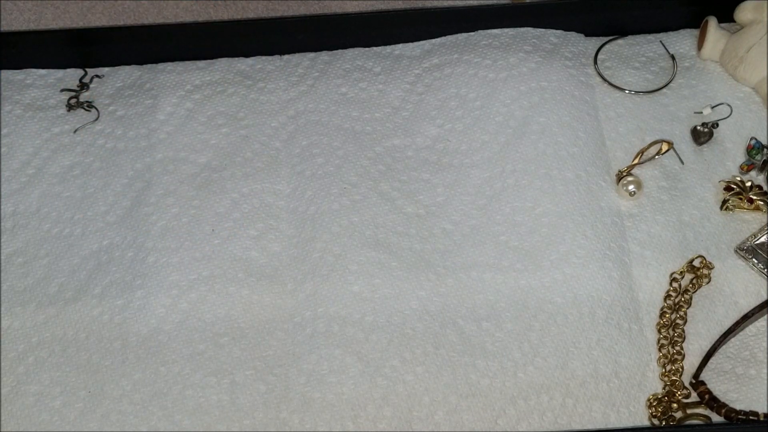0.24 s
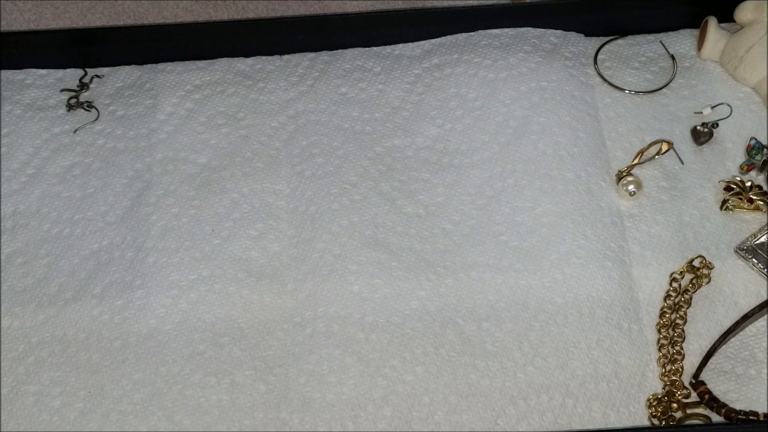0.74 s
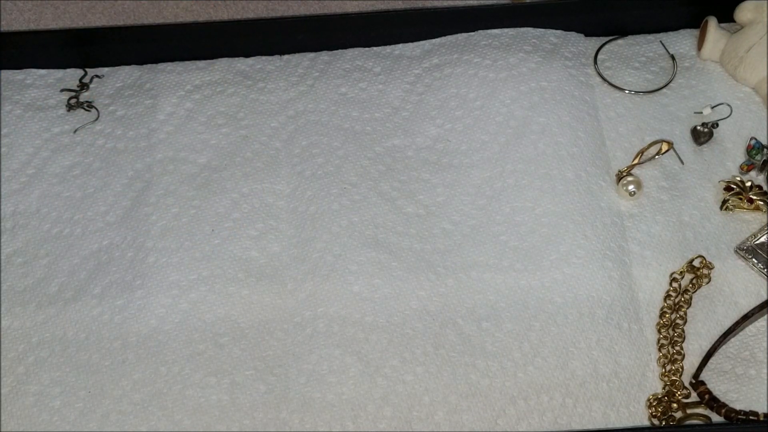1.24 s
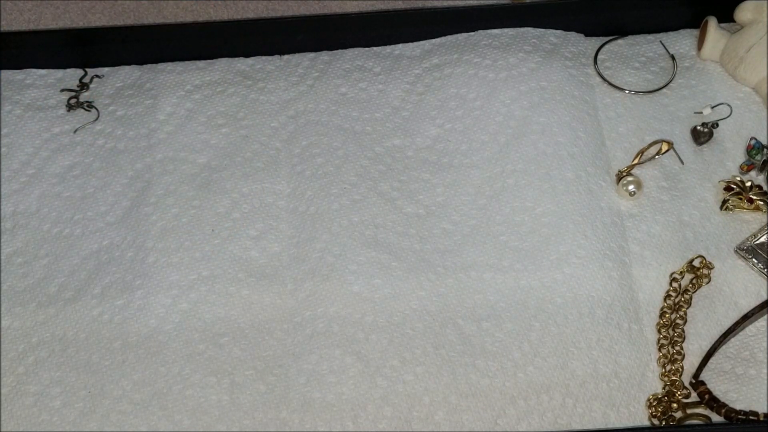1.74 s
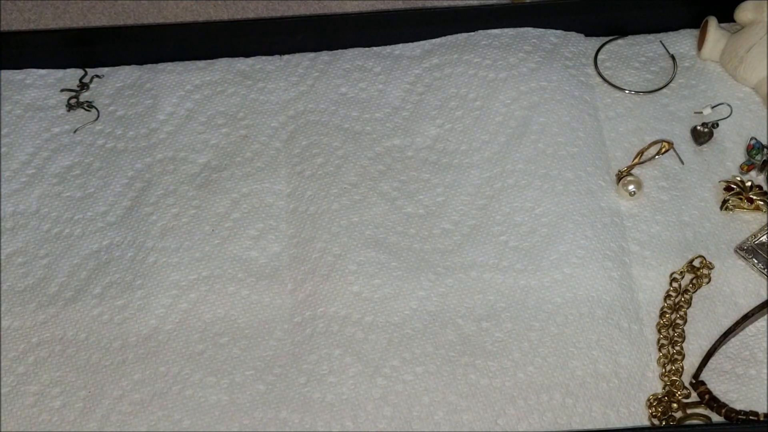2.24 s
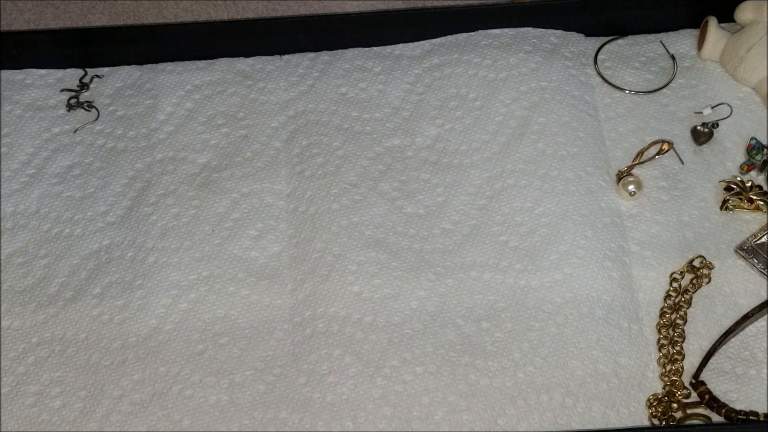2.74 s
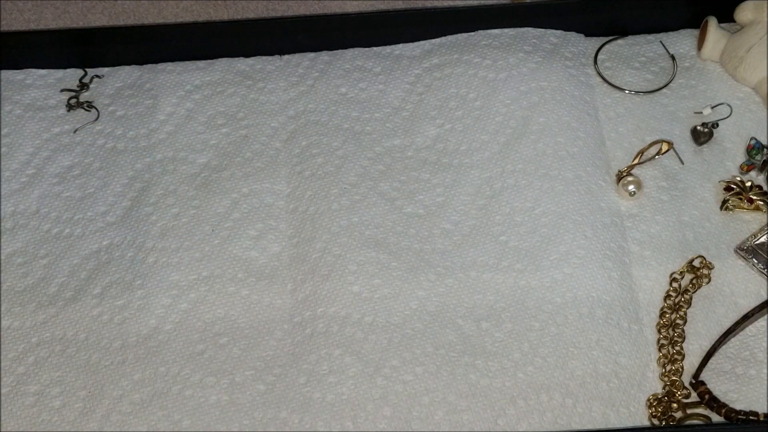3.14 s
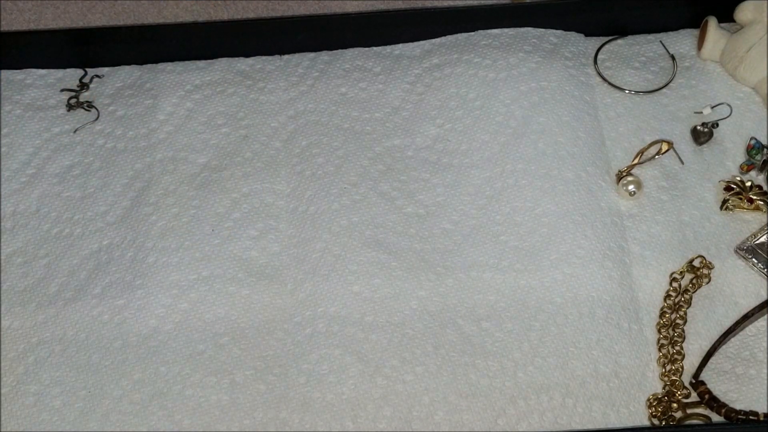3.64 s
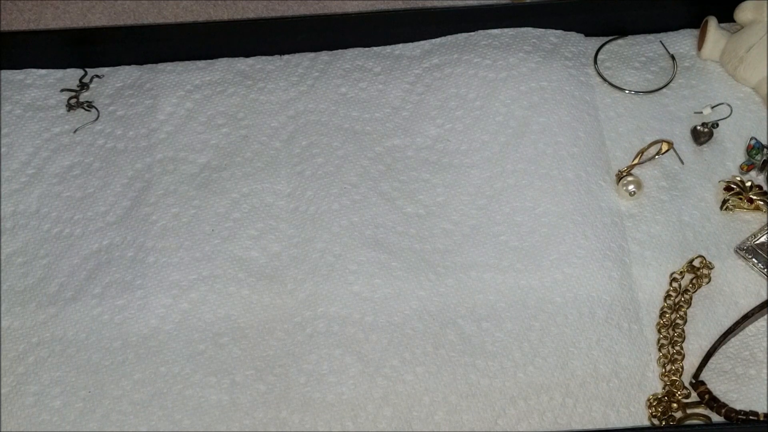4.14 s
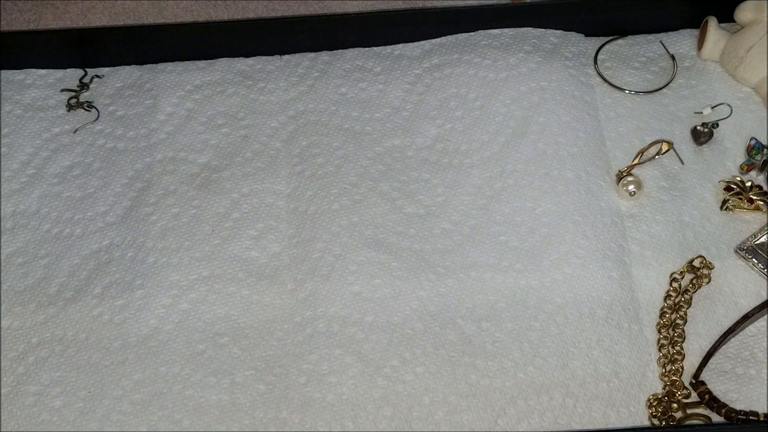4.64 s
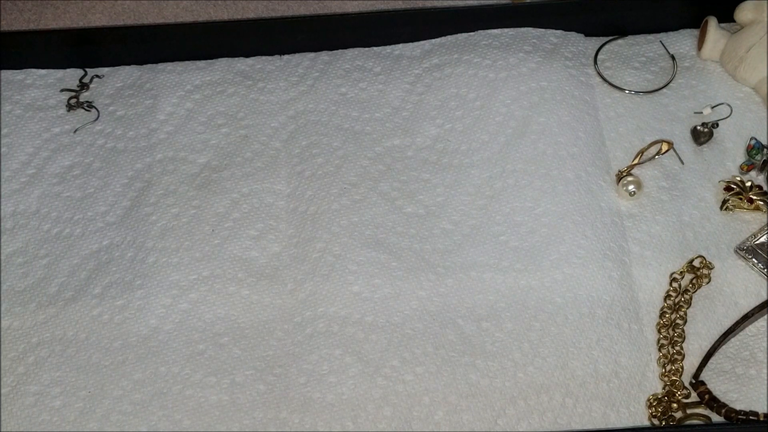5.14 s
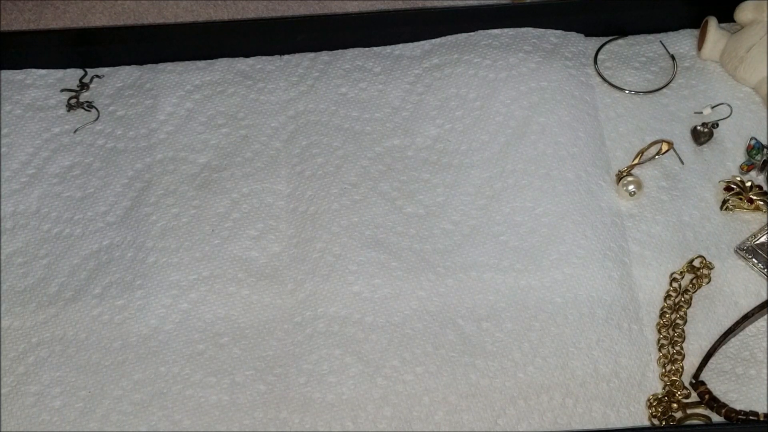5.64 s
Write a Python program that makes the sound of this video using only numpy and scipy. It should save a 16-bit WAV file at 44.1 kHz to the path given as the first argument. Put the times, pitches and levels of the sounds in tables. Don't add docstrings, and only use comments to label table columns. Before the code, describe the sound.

Very close stereo pickup in a quiet, softly damped room with low rumble and faint hiss. Sparse tiny bead ticks come first, then a jar tugs across padding, gets knocked hard, bounces and rattles briefly to rest. After a near-silent gap a hand thumps the table, then chains and beads rustle and clink against the jar until the end, slightly to the right.

```python
import sys
import numpy as np
from scipy import signal
from scipy.fft import rfft, irfft
from scipy.io import wavfile
from scipy.ndimage import uniform_filter1d

SR = 44100
rng = np.random.default_rng(int(sys.argv[2]) if len(sys.argv) > 2 else 0)


def gain_from_db(level_db):
    decades = np.asarray(level_db, float) / 20
    return 10 ** decades


def store_wav(level_fs):
    pcm = np.round(np.clip(np.atleast_2d(level_fs), -1, 1) * 32767)
    wavfile.write(sys.argv[1], SR, pcm.T.astype(np.int16))


N = 259749
RING_SIZE = 4096

# mode_hz, width_hz, level_db
JAR_ON_TABLE = [(506, 25, -1), (581, 17, 0.5), (690, 34, 0), (837, 56, -6), (947, 64, 8.5), (1130, 48, 3.5),
                (1415, 45, -0.5), (1535, 41, -10.5), (1736, 78, 7.5), (2063, 26, 0), (2220, 22, -8.5),
                (2700, 130, 1.5), (4330, 200, -5), (5690, 120, -2)]
# freq_hz, level_db_per_hz
KNOCK_COLOUR = [(200, -38.5), (300, -23), (360, -5), (480, -4.5), (1000, -11), (1700, -2.5), (2500, -12.5),
                (4300, -14), (6200, -22), (7500, -33), (10000, -16), (16000, -21)]
# freq_hz, level_db_per_hz
CLINK_COLOUR = [(200, -19.5), (450, -1.5), (900, -12.5), (1650, -11.5), (2180, -0.5), (2800, -10.5),
                (3800, -0.5), (6500, -4), (8000, -10), (11000, -3.5), (15500, -5.5), (17000, -7.5)]
# mode_hz, width_hz, level_db
PADDING = [(770, 120, 4.5), (1050, 300, 12), (1490, 380, -2.5), (2970, 62, 3), (3150, 280, -16),
           (5200, 240, -11)]
# freq_hz, level_db_per_hz
PAD_COLOUR = [(300, -21), (450, -2), (1200, -5.5), (2050, -14.5), (2800, -8.5), (3700, -8.5), (7500, -24.5),
              (16000, -19.5)]
JAR = dict(modes=JAR_ON_TABLE, colour=KNOCK_COLOUR, ring_db=-2.5, snap_db=1.5, spread_db=6.5, wander=0.0026)
PAD = dict(modes=PADDING, colour=PAD_COLOUR, ring_db=11.0, snap_db=4.0, spread_db=0.0, wander=0.015)


def evened(x):
    return x / np.sqrt(np.mean(x ** 2) + 1e-20)


def read(points, hz):
    f, value = np.transpose(points)
    return np.interp(np.log(hz + 1), np.log(f + 1), value)


def noise(colour, same, size, patchy_db):
    hop, hz = size // 4, np.fft.rfftfreq(size, 1 / SR)
    a, b, c, d, patches = rng.standard_normal((N // hop + 5, len(hz), 5)).T
    patches = uniform_filter1d(patches, size=4, axis=0)
    patches = evened(uniform_filter1d(patches, size=6, axis=1))
    same = np.clip(read(same, hz), -1, 1)[:, None]
    left, other = a + 1j * b, c + 1j * d
    z = np.array([left, same * left + np.sqrt(1 - same ** 2) * other])
    z *= gain_from_db(read(colour, hz)[:, None] + patchy_db * patches)
    return evened(signal.istft(z, nperseg=size, noverlap=size - hop)[1][:, :N])


def bands(low_hz):
    upper_hz = (1200, 3000, 8000, 16800)
    hz, edges = np.fft.rfftfreq(RING_SIZE, 1 / SR), (low_hz, *upper_hz)
    responses = []
    for k in range(4):
        sos = signal.butter(4, edges[k:k + 2], "bandpass", fs=SR, output="sos")
        responses.append(signal.sosfreqz(sos, hz, fs=SR)[1])
    return np.array(responses)[:, None]


def causal(db):
    log_gain = np.log(gain_from_db(np.maximum(db, -100)))
    mirrored = np.r_[log_gain, log_gain[-2:0:-1]]
    return np.exp(np.conj(signal.hilbert(mirrored))[:len(db)])


def shares(pieces, jar, base_db, wall_db, clink_db, sizzle_db, pull):
    hard_from_db, hard_slope = -42, 0.33
    thud = jar - hard_slope * np.maximum(jar - hard_from_db, 0)
    wall = jar + pull * (pieces - jar)
    return [thud + base_db, wall + wall_db, pieces + clink_db, pieces + sizzle_db]


def body(modes, colour, ring_db, snap_db, spread_db, wander, decay):
    ring_t60_s = (0.12, 0.082, 0.093, 0.015)
    ear_same = (0.94, 0.64, 0.2, 0.33)
    t, bins = np.arange(RING_SIZE) / SR, np.fft.rfftfreq(RING_SIZE, 1 / SR)
    hz, width, db = np.transpose(modes)[:, :, None]
    chance = rng.standard_normal((3, len(modes), 1))
    hz = hz * (1 + wander * np.maximum(hz / 1000 - 2.5, .1) * chance[0])
    ear_phase = np.array([0, 1])[:, None, None] * chance[2] * np.minimum(hz / 3000, 1.5)
    tones = gain_from_db(db + spread_db * chance[1]) * np.exp(-np.pi * width * t)
    tones = tones * np.sin(2 * np.pi * hz * t + ear_phase)
    tones = gain_from_db(ring_db) * tones.sum(1) / gain_from_db(db.max())
    same = np.clip(ear_same, 0, 1)[:, None, None]
    grit = rng.standard_normal((3, len(t)))
    grit = np.sqrt(same) * grit[0] + np.sqrt(1 - same) * grit[1:]
    grit *= gain_from_db(-60 * t / (decay * np.array(ring_t60_s)[:, None, None]))
    grit[..., 0] += gain_from_db(snap_db)
    shape = causal(read(colour, bins))
    fade = np.minimum(4 * (1 - t / t[-1]), 1)
    return rfft(grit) * shape / np.sqrt(np.mean(abs(shape) ** 2)) + rfft(tones * fade)


def contacts(rows, mix, fine_db, chatter_db, chatter_s, low_hz, piece, modes, **object_traits):
    out, ranges = np.zeros((2, N + RING_SIZE)), bands(low_hz)
    bins = np.fft.rfftfreq(RING_SIZE)
    for s, pieces, jar, piece_hz in rows:
        taps = rng.standard_normal(600) * (rng.random(600) < .025)
        taps *= np.exp(-(np.arange(600) / SR / chatter_s) ** 2)
        taps = np.r_[1, gain_from_db(chatter_db) * taps[1:]]
        late = np.exp(-2j * np.pi * bins * [[0], [7 * rng.random()]])
        struck = (piece_hz, piece[0] * max(piece_hz / 5000, 1), piece[1])
        blow = body(modes + [struck], **object_traits)
        parts = irfft(blow * ranges * late * rfft(taps, RING_SIZE))
        fine = fine_db * np.log2(piece_hz / 4000)
        levels = gain_from_db(shares(pieces, jar, *mix) + fine * np.array([0, 0.029, 0.34, 1.0]))
        heads = np.sqrt((parts[:, :, :400] ** 2).mean((1, 2)))
        out[:, round(s * SR):][:, :RING_SIZE] += np.tensordot(levels / heads, parts, 1)
    return out[:, :N]


def stir(rows, mix, fine_db, per_s, size_db, low_hz, **object_traits):
    s, pieces, jar = np.transpose(rows)
    t = np.arange(s[0], s[-1], 1 / SR)
    parts, ranges = 0, bands(low_hz)
    for spot in range(5):
        slips = gain_from_db(size_db * np.minimum(rng.exponential(1, len(t)), 4))
        slips *= rng.random(len(t)) < per_s / 2 / SR
        slips *= rng.choice([-1., 1.], len(t))
        ring = irfft(body(**object_traits) * ranges)[..., :RING_SIZE // 2]
        parts += signal.fftconvolve(ring, slips[None, None], axes=2)[..., :len(t)]
    edge = signal.windows.tukey(len(t), 600 / len(t))
    levels = shares(pieces, jar, *mix) + fine_db * np.array([[0], [0], [-.25], [1]])
    moving = sum(evened(p) * gain_from_db(np.interp(t, s, db)) for p, db in zip(parts, levels))
    out = np.zeros((2, N + SR))
    out[:, round(s[0] * SR):][:, :len(t)] = moving * edge
    return out[:, :N]


def background():
    # time_s, level_db
    load = [(0.0, -65.5), (1.228, -64), (2.39, -61.5), (2.75, -65), (2.97, -59), (3.229, -63.5),
            (3.48, -65.5), (3.62, -60), (3.8, -64.5), (4.04, -65), (4.12, -58.5), (4.23, -64),
            (4.66, -59.5), (4.94, -65), (5.22, -59), (5.41, -66), (5.45, -59.5), (5.89, -61)]
    # freq_hz, level_db_per_hz
    rumble_colour = [(65, -43), (110, -22.5), (140, 1.5), (200, 1.5), (232, -3), (265, 6.5), (293, -5.5),
                     (312, -11), (342, -6), (365, -22.5), (600, -17.5), (780, -52), (1320, -120)]
    deep_colour = [(12, -26), (20, -0.5), (32, -13.5), (81, 7), (120, -5), (160, -29), (260, -120)]
    hiss_colour = [(180, -21), (300, -3.5), (315, -14), (399, 1.5), (464, -12.5), (705, -12), (754, -12.5),
                   (1060, -14), (1310, -15), (2400, -15.5), (7890, -30.5), (15200, -21.5), (16500, -37)]
    # freq_hz, likeness
    rumble_same = [(30, 0.093), (300, 0.98)]
    deep_same = [(30, .93), (120, .93)]
    hiss_same = [(60, -1.5), (180, 1), (550, 0.044), (1650, -0.11), (4970, 0.026), (15000, -0.0094)]
    deep_rest_db, deep_growth, hiss_db = -74, 1.6, -67.5
    load_db = np.interp(np.arange(N) / SR, *np.transpose(load))
    rumble = noise(rumble_colour, rumble_same, size=2048, patchy_db=1.6) * gain_from_db(load_db)
    deep_db = deep_rest_db + deep_growth * (load_db - np.median(load_db))
    rumble += noise(deep_colour, deep_same, size=2048, patchy_db=4.5) * gain_from_db(deep_db)
    rumble[1] = np.roll(rumble[1], shift=10)
    return rumble + gain_from_db(hiss_db) * noise(hiss_colour, hiss_same, size=512, patchy_db=0.3)


def room(x, t60, dull_hz):
    taps = np.zeros((2, SR // 2))
    at = np.arange(200, SR // 2 - 20, 20) + rng.integers(0, 20, (2, (SR // 2 - 201) // 20))
    np.put_along_axis(taps, at, rng.choice([-1., 1.], at.shape), 1)
    taps *= gain_from_db(-60 * np.arange(SR // 2) / SR / t60)
    taps = signal.lfilter(*signal.butter(1, dull_hz, fs=SR), taps)
    return signal.fftconvolve(x, taps / np.linalg.norm(taps[0]), axes=1)[:, :N]


def ticks():
    # start_s, pieces_db, jar_db, pitch_hz
    events = [(0.1007, -55, -68.5, 2030), (0.429, -60, -67.5, 3660), (0.4936, -74, -65, 1640),
              (0.5224, -79, -65, 1620), (0.6174, -40, -56, 3430), (0.7082, -48, -68, 1820),
              (0.7276, -45.5, -59.5, 3360), (0.7477, -42.5, -52.5, 890), (0.9048, -44, -57, 1830),
              (1.1148, -55, -57, 2000), (1.5894, -59, -68.5, 1890), (1.7853, -42.5, -51.5, 2790),
              (1.945, -54.5, -60, 1880), (2.7157, -54, -64, 2640), (2.7216, -43, -66, 4700),
              (2.736, -42, -59, 1700), (2.7766, -46.5, -55, 2785), (3.5527, -65, -62.5, 2062),
              (4.2184, -57.5, -70, 2900)]
    # mode_hz, width_hz, level_db
    beads = [(1630, 2100, 18.5), (2050, 36, -27), (2940, 82, -15), (3360, 42, 1.5), (3420, 130, 15),
             (4270, 100, 15)]
    # freq_hz, level_db_per_hz
    tick_colour = [(290, -28), (500, -9), (761, -18.5), (1600, 2.5), (3490, 1), (8090, -4.5), (15100, 8),
                   (16000, -8)]
    return contacts(events, (-12, -1.7, -13.0, -11.5, -0.084), fine_db=3.0, chatter_db=-6, chatter_s=0.0037,
                    low_hz=387, piece=(110, 9.), decay=1.0, modes=beads, colour=tick_colour,
                    ring_db=-9, snap_db=22, spread_db=13.5, wander=0.015)


def drags():
    # time_s, pieces_db, jar_db
    stretches = [
        [(2.69, -88, -92), (2.698, -87, -76), (2.722, -59.5, -66), (2.785, -53.5, -62)],
        [(2.795, -39.5, -28.5), (2.805, -54.5, -46.5), (2.831, -60.5, -50), (2.86, -65.5, -63)],
        [(2.86, -66, -63), (2.886, -50, -44), (2.91, -49, -48), (2.94, -49.5, -51.5)],
    ]
    return sum(stir(rows, (-1.5, -9.5, -4.5, -7.0, -1.34), fine_db=2.5, per_s=6300, size_db=2.5,
                    low_hz=330, decay=0.96, **PAD) for rows in stretches)


def catches():
    # start_s, pieces_db, jar_db, pitch_hz
    events = [
        (2.7002, -59, -74, 696),
        (2.7936, -38.5, -40.5, 1280),
        (2.8174, -48, -46, 1250),
        (2.873, -65, -55.5, 2700),
        (2.9037, -38, -51.5, 3160),
    ]
    return contacts(events, (2.5, -6.0, -3.5, -11.5, -0.5), fine_db=1.2, chatter_db=0.5, chatter_s=0.021,
                    low_hz=348.3, piece=(150, 4.), decay=0.75, **PAD)


def knocks():
    # start_s, pieces_db, jar_db, pitch_hz
    events = [
        (2.947, -14, -13.5, 1680),
        (2.955, -23.5, -30, 1820),
        (2.9874, -35.5, -50, 1770),
        (3.0011, -24, -18.5, 1050),
        (3.0076, -18, -34.5, 1130),
        (3.038, -23.5, -30.5, 511),
        (3.046, -20, -33, 482),
        (3.0749, -22, -36, 476),
        (3.105, -29, -41.5, 1130),
        (3.124, -28.5, -42, 470),
    ]
    return contacts(events, (1.5, -1.5, -9.0, -13.0, -0.06), fine_db=1.86, chatter_db=-2.5,
                    chatter_s=.0065, low_hz=354.0, piece=(150, 6.), decay=.58, **JAR)


def slides():
    # time_s, pieces_db, jar_db
    rattling = [
        (2.96, -32.5, -21.5),
        (2.984, -39, -40.5),
        (2.999, -40, -44.5),
        (3.004, -29.5, -23.5),
        (3.02, -35.5, -36.5),
        (3.036, -37.5, -39),
        (3.042, -33.5, -32.5),
        (3.165, -41.5, -32),
        (3.23, -84, -90),
    ]
    # mode_hz, width_hz, level_db
    rim_and_base = [(478, 45, 9), (5800, 71, 2.5)]
    traits = dict(JAR, modes=JAR_ON_TABLE + rim_and_base)
    return stir(rattling, (-4.5, -3.0, -6.0, -11.0, 1.7), fine_db=1.5, per_s=310, size_db=3.0,
                low_hz=360, decay=.45, **traits)


def thumps():
    # start_s, pieces_db, jar_db, pitch_hz
    events = [
        (3.6755, -89, -61, 295),
        (4.1084, -25.5, -22, 690),
        (4.2624, -56, -54.5, 503),
        (4.5375, -60, -46.5, 1520),
        (4.5465, -47, -44, 1400),
        (4.5687, -35.5, -42, 705),
        (4.6402, -37, -35, 690),
        (5.428, -46.5, -42.5, 780),
        (5.4805, -59, -46, 460),
        (5.724, -69, -46.5, 442),
    ]
    # mode_hz, width_hz, level_db
    table_top = [(324, 290, -20), (463, 180, -13), (695, 45, -4.5), (1060, 350, -23), (1400, 260, 2.5),
                 (2000, 150, -26), (2490, 160, -37)]
    # freq_hz, level_db_per_hz
    thump_colour = [(71, -47), (120, -21), (698, -5.5), (1210, -15), (1370, -16), (1490, -10), (1860, -0.5),
                    (3240, -7.5), (16000, -34)]
    return contacts(events, (1.5, -13.5, -17.0, -25.0, 1.3), fine_db=-0.5, chatter_db=-27.5, chatter_s=0.0098,
                    low_hz=224.0, piece=(220, 10.), decay=0.81, modes=table_top, colour=thump_colour,
                    ring_db=4.0, snap_db=10.0, spread_db=6.5, wander=0.018)


def clinks():
    # start_s, pieces_db, jar_db, pitch_hz
    events = [(4.1075, -42.5, -82, 9300), (4.4049, -49.5, -64, 4020), (4.4143, -44, -57, 4300),
              (4.4361, -54.5, -70, 15000), (4.495, -51, -55, 4330), (4.506, -27, -48.5, 3560),
              (4.5371, -33, -51, 2670), (4.546, -38, -60, 13800), (4.555, -45, -46, 8700),
              (4.563, -42, -42, 9600), (4.5984, -39, -68, 6050), (4.626, -21.5, -90, 3800),
              (4.639, -31, -78, 3870), (4.679, -24.5, -65, 3550), (4.684, -46, -66, 3700),
              (4.6913, -31, -40.5, 13930), (4.7808, -41, -52, 6400), (4.8614, -49.5, -56, 4360),
              (4.9212, -64, -82, 10500), (4.9341, -55, -63, 11400), (4.9568, -43, -86, 7100),
              (4.9975, -53, -71, 12200), (5.0304, -47.5, -76, 10300), (5.0523, -39, -69, 9500),
              (5.081, -41, -55, 8210), (5.0996, -32, -48.5, 8900), (5.1246, -21.5, -46, 3600),
              (5.129, -26, -53, 6500), (5.15, -51, -68, 12700), (5.1655, -45, -76, 9800),
              (5.1926, -57, -64, 10100), (5.2168, -31, -53, 9100), (5.228, -22, -61, 4640),
              (5.2384, -30, -55.5, 10240)]
    last_events = [(5.361, -67, -60, 11060), (5.389, -58, -58.5, 6200), (5.4554, -48, -56, 12500),
                   (5.516, -35, -57, 3500), (5.526, -44, -64, 8950), (5.539, -36, -51, 4020),
                   (5.5445, -28, -66, 3580), (5.5604, -32.5, -54, 3700), (5.6106, -25, -56, 3530),
                   (5.635, -20.5, -47.5, 3790), (5.646, -34, -58, 4140), (5.673, -32.5, -61, 3900),
                   (5.7229, -46.5, -86, 6600), (5.8052, -40, -61, 12200)]
    # mode_hz, width_hz, level_db
    jar_in_hand = [(452, 140, 4), (757, 65, -6), (2222, 76, 10.5), (3550, 560, 8), (4155, 120, 3.5)]
    return contacts(events + last_events, (-2.0, -6.0, -12.0, -17.5, 0.3474), fine_db=10.0, chatter_db=-10.0,
                    chatter_s=0.0049, low_hz=274, piece=(130, 7.), decay=0.87, modes=jar_in_hand,
                    colour=CLINK_COLOUR, ring_db=7.5, snap_db=4, spread_db=3.5, wander=0.0071)


def stirring():
    # time_s, pieces_db, jar_db
    stretches = [
        [(4.38, -82, -77), (4.41, -61, -61), (4.445, -56, -53), (4.46, -71, -55), (4.49, -66, -56),
         (4.51, -60, -62), (4.535, -56, -60), (4.56, -42, -52), (4.59, -57, -69)],
        [(4.59, -60, -64), (4.602, -48, -51), (4.625, -50.5, -54.5), (4.665, -53, -48.5), (4.70, -43, -58),
         (4.74, -52.5, -50), (4.775, -62.5, -54), (4.805, -65, -69), (4.85, -71, -66)],
        [(4.85, -81, -68), (4.915, -71, -66.5), (4.94, -57, -49), (4.985, -66, -54), (5.005, -57, -48),
         (5.045, -60, -56), (5.06, -52, -49), (5.09, -68, -61)],
        [(5.09, -44, -48), (5.135, -49, -57), (5.16, -51, -55), (5.185, -53.5, -57), (5.21, -54, -52),
         (5.235, -37.5, -51), (5.265, -50.5, -63), (5.30, -64, -74.5), (5.33, -82, -80)],
        [(5.33, -81, -77), (5.445, -72.5, -68), (5.465, -57, -72), (5.505, -71, -63), (5.52, -62, -64),
         (5.555, -39, -57), (5.58, -58, -64), (5.6, -48, -68)],
        [(5.6, -57.5, -59), (5.62, -59, -57), (5.65, -48, -50), (5.69, -56, -64.5), (5.715, -68, -57),
         (5.74, -63, -54), (5.795, -72, -50.5), (5.815, -60, -41.5), (5.89, -77, -48.5)],
    ]
    fine_chain_db = (3.7, 4.6, 10.5, 7.6, 0.42, 2.8)
    wall_pull = (0.39, .68, 0.45, 0.7, 0.67, .25)
    # mode_hz, width_hz, level_db
    links = [(430, 240, 14), (720, 70, -5), (2090, 110, -7), (3700, 740, 6), (6500, 400, 0), (8800, 450, 0),
             (10500, 700, 6)]
    return sum(stir(rows, (-4.0, -7.5, -3.5, -4.5, pull), fine_db=fine, per_s=520, size_db=-2.0,
                    low_hz=307, decay=0.53, modes=links, colour=CLINK_COLOUR,
                    ring_db=4.0, snap_db=2.0, spread_db=8.0, wander=0.0051)
               for rows, fine, pull in zip(stretches, fine_chain_db, wall_pull))


def scene():
    # freq_hz, left_minus_right_db
    ear_shade = [(60, 9), (150, -6.5), (380, 0.5), (950, -3.5), (2380, -2), (5980, -2), (15000, -3.5)]
    near = ticks() + drags() + catches() + knocks() + slides() + thumps() + clinks() + stirring()
    shade = read(ear_shade, np.fft.rfftfreq(N, 1 / SR)) / 2
    near = irfft(rfft(near) * gain_from_db([shade, -shade]), N)
    return near + gain_from_db(-12.5) * room(near, t60=0.077, dull_hz=6077) + background()


def top_cut(x):
    return signal.sosfilt(signal.butter(12, 16990, fs=SR, output="sos"), x)


def record(dry):
    edge_hz, leak_db = 15850, -34.5
    low = signal.oaconvolve(dry, signal.firwin(255, edge_hz, fs=SR)[None], "same")
    return top_cut(low + gain_from_db(leak_db) * (dry - low))


dry = scene()
out = record(dry)
store_wav(out)
```